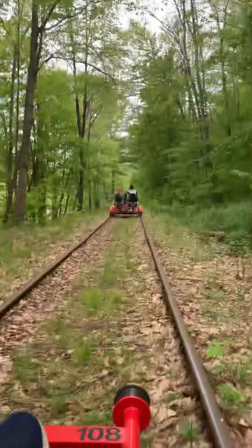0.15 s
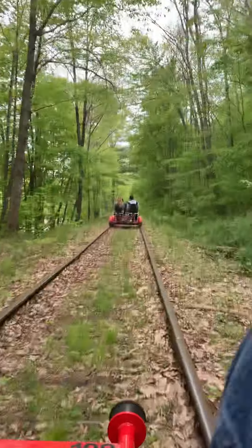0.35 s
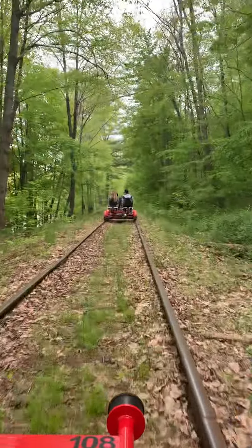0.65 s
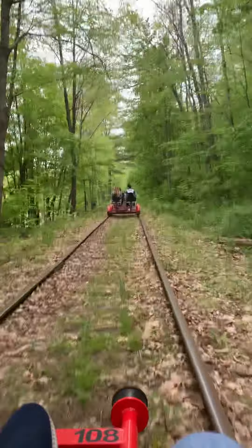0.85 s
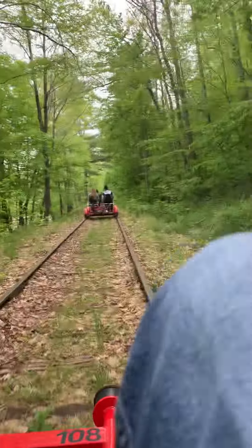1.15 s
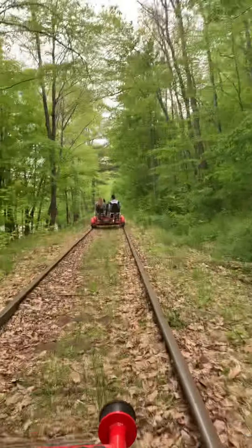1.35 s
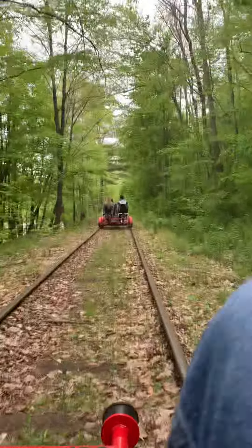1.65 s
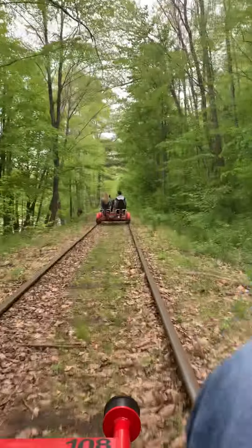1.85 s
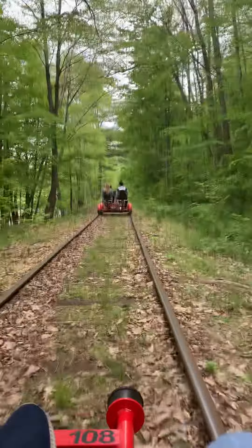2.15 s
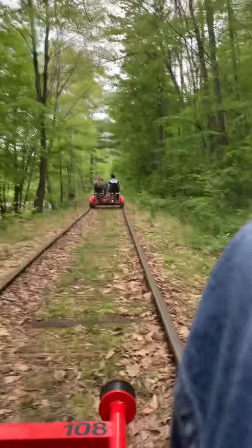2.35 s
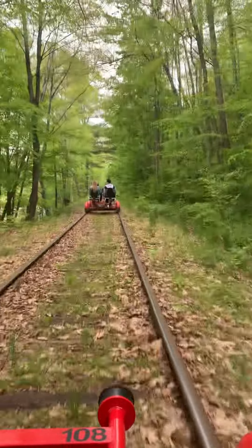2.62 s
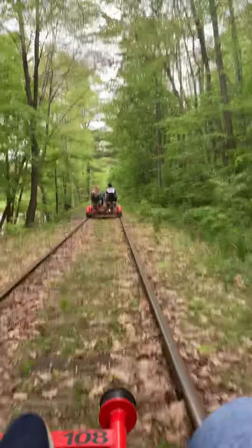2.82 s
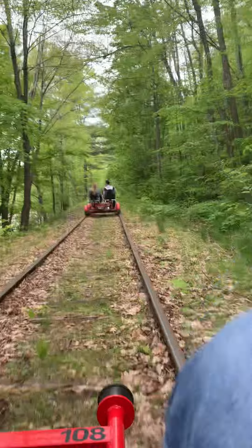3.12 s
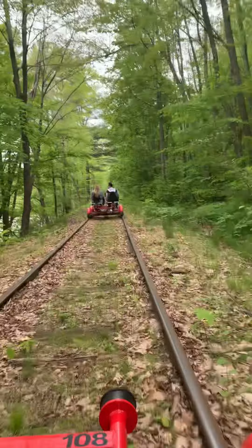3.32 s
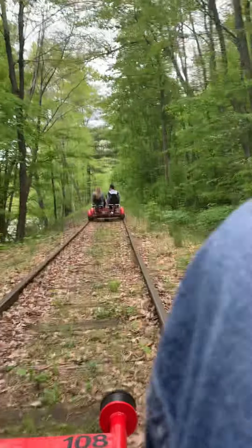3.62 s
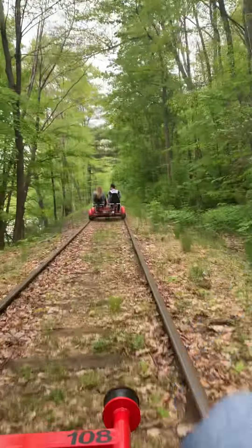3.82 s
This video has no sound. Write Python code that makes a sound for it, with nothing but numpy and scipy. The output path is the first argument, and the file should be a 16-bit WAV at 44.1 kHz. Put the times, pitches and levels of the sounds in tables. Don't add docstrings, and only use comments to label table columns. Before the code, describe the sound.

Hard wheels of a pedal-driven rail cart roll with low rumble, metallic rattling and sharp knocks.

```python
import sys
import numpy as np
from scipy import signal
from scipy.fft import rfft, irfft, dct, next_fast_len
from scipy.io import wavfile
from scipy.ndimage import uniform_filter1d

SR = 44100
rng = np.random.default_rng(int(sys.argv[2]) if len(sys.argv) > 2 else 0)


def invert_db(level):
    return 10 ** (np.asarray(level, dtype=float) / 20)


def transcribe(signal):
    frames = np.atleast_2d(signal).T
    limited = np.clip(frames, -1, 1)
    pcm = np.round(limited * 32767).astype(np.int16)
    wavfile.write(sys.argv[1], SR, pcm)


N = 175518

SIZE, HIT = next_fast_len(N), 4096
F_HZ = np.arange(SIZE // 2 + 1) * SR / SIZE
HIT_HZ = np.arange(HIT // 2 + 1) * SR / HIT
NOISE = rng.standard_normal((2, N))
WHITE = rfft(NOISE, SIZE)


def line(table, hz):
    table = np.array(table, float)
    return np.interp(np.log(hz + 1), np.log(table[:, 0]), table[:, 1])


def unit(x):
    return x / np.sqrt(np.mean(np.abs(x) ** 2, axis=-1, keepdims=True))


def walk(rate_hz):
    hold = int(SR / rate_hz)
    steps = np.repeat(rng.standard_normal(N // hold + 1), hold)
    return 1.68 * uniform_filter1d(uniform_filter1d(steps, hold), hold)[:N]


def shaped(gain):
    return irfft(np.roll(WHITE, rng.integers(SIZE // 2), axis=1) * gain, SIZE)[:, :N]


def ring(hz, width_hz, order):
    r = np.exp(-np.pi * width_hz / SR)
    x = np.roll(NOISE, rng.integers(N), axis=1)
    for _ in range(order):
        x = signal.lfilter([1], [1, -2 * r * np.cos(2 * np.pi * hz / SR), r * r], x)
    return unit(x)


def mode(f, hz, width_hz):
    return 1 / (1 + 2j * (f - hz) / width_hz)


def glide(x):
    rate = 0.07 * walk(9)
    at = np.arange(N) + np.cumsum(rate - rate.mean())
    return np.array([np.interp(at, np.arange(N), v) for v in x])


def burst(length_s, rise_s, tail_db, tail_s=0.055):
    t = np.arange(HIT) / SR
    blow = invert_db(-2) * np.exp(-t / 0.004)
    shudder = np.exp(-(t / length_s[:, None, None]) ** 2)
    tail = invert_db(tail_db) * np.exp(-t / tail_s)
    shape = (1 - np.exp(-t / rise_s)) * (blow + shudder + tail) * (1 - t / t[-1])
    return rfft(shape * rng.standard_normal((len(length_s), 2, HIT)))


def place(hits, table, trim_db):
    out = np.zeros((2, N + HIT))
    for (t, db, *_), hit in zip(table, hits):
        i = int(t * SR)
        out[:, i:i + HIT] += invert_db(db + trim_db) * hit / np.abs(hit).max()
    return out[:, :N]


# f/Hz, width/Hz, level/dB
BODY = [(114.3, 67, -6), (147.3, 26.6, 0.5), (176.6, 31, 0), (211, 47, 0.5), (249, 57, -0.5),
        (304.6, 38, -1.5), (345.2, 32.7, 1.5)]
# f/Hz, density/dB per Hz
GROUND = [(20, -44), (40, -30), (65, -9), (100, -21), (160, 13.5), (350, -4), (600, -32), (2500, -74)]


def rumble(load_db):
    modes = 0
    for hz, width_hz, db in BODY:
        modes = modes + invert_db(db + 1.58 * walk(18)) * glide(ring(hz, width_hz, order=2))
    deep = invert_db(1.8 * walk(9.35)) * unit(shaped(invert_db(line(GROUND, F_HZ))))
    return invert_db(load_db - 0.04) * (unit(modes) + invert_db(-7) * deep)


# f/Hz, width/Hz, level/dB
FRAME = [(594, 22, -2.5), (690, 113, 3), (759, 21, 2), (955, 36, 0), (1054, 240, -9), (1275, 31, 2),
         (1480, 115, -1), (1536, 20, -10), (2038, 27, -11), (2500, 97, -5), (2676, 180, -12),
         (3170, 19, -9), (3424, 54, -9.5), (3977, 24, -47)]
# f/Hz, density/dB per Hz
LOOSE_COLOUR = [(300, -2), (600, 1.3), (1400, -7.5), (2200, -13.5), (4500, -17.5), (8000, -23.5),
                (11000, -31.5), (16000, -37)]


def chatter(shake_db):
    mean_db = shake_db.mean()
    swing_db = shake_db - mean_db
    jolt, crackle_db = walk(24), 1.7 * walk(90)
    buzz = rings = 0
    for hz in 300 * 2 ** np.arange(0, 6.1, 0.5):
        band = np.exp(-(np.log2((F_HZ + 1) / hz) / 0.46) ** 2)
        follow = 1 if hz < 4000 else 0.38
        level_db = follow * (swing_db + 1.35 * jolt) + 1.85 * walk(35)
        level_db = level_db + (hz > 4000) * crackle_db
        buzz = buzz + invert_db(level_db) * shaped(invert_db(line(LOOSE_COLOUR, F_HZ)) * band)
    for hz, width_hz, db in FRAME:
        rings = rings + invert_db(db + 1.7 * jolt + 3.7 * walk(24.01)) * ring(hz, width_hz, order=1)
    return invert_db(mean_db + 2) * (unit(buzz) + invert_db(-3 + swing_db) * unit(rings))


def sure(blows, response):
    strength = np.sqrt(np.mean(np.abs(blows) ** 2) * np.mean(np.abs(response) ** 2))
    return unit(blows * response[:, None]) * strength


def strike(table, length_s, rise_s, trim_db, high_db=-5):
    f, rows, frame = HIT_HZ, np.array(table), np.array(FRAME)
    mix = invert_db(2.5 * rng.standard_normal((len(rows), len(frame))) + frame[:, 2])
    rings = mix @ np.array([(-1) ** k * mode(f, hz, w) for k, (hz, w, _) in enumerate(FRAME)])

    bright_db = rows[:, 2:3] + 21
    tilt_db = bright_db * np.clip(np.log2((f + 1) / 2000), 0, 1)
    dull_db = -5.5 * np.maximum(np.log2((f + 1) / 4500), 0)
    rough = invert_db(tilt_db + dull_db) * invert_db(line(LOOSE_COLOUR, f)) * np.clip(f / 300, 0, 1)
    body = rough + invert_db(-1) * rings + invert_db(-1.5) * mode(f, 261, 150)

    blows = burst(np.full(len(rows), length_s), rise_s, tail_db=-4)
    low = invert_db(6) * sure(blows, mode(f, rows[:, 3:4], 72))
    high = invert_db(high_db + 0.76 * bright_db[:, :, None]) * sure(blows, mode(f, rows[:, 4:5], 72))
    return place(irfft(blows * body[:, None] + low + high, HIT), table, trim_db)


# t/s, peak level/dB, brightness/dB, low ring f/Hz, high ring f/Hz
CLACKS = [(0.022, -7.5, -27.5, 616, 2270), (0.389, 0, -23, 806, 1990), (0.592, -2.5, -29, 602, 2110),
          (0.931, -0.5, -14, 1480, 3450), (1.496, -1.5, -23.5, 1242, 1900), (1.854, -5.5, -20.5, 605, 2440),
          (2.415, -3.5, -26, 1573, 2220), (2.726, -4, -33, 740, 2030), (3.0, -3.5, -23, 720, 2050),
          (3.067, -7, -22, 940, 2620), (3.804, -6, -23, 594, 2090)]


def clacks():
    return strike(CLACKS, length_s=0.026, rise_s=0.0009, trim_db=0.84)


# t/s, peak level/dB, ring f/Hz
BUMPS = [(0.028, -10.5, 290), (0.388, -9, 263), (0.518, -12.5, 142), (0.594, -9.5, 321), (0.663, -9, 180),
         (0.899, -12, 220), (1.135, -14, 215), (1.217, -11.5, 229), (1.275, -11, 150), (1.451, -10, 223),
         (1.492, -8, 312), (1.538, -14, 175), (1.845, -11, 175), (2.172, -7.5, 226), (2.215, -9.5, 150),
         (2.417, -11, 164), (2.677, -11, 202), (3.003, -11, 270), (3.064, -8.5, 323), (3.153, -9.5, 195),
         (3.252, -9, 282), (3.809, -12.5, 300)]


def bumps():
    rows = np.array(BUMPS)
    blows = burst(np.full(len(rows), 0.018), rise_s=0.004, tail_db=-13.5)[:, :1]
    swing = mode(HIT_HZ, rows[:, 2:3], 66)[:, None] ** 2
    return place(irfft(blows * swing, HIT), BUMPS, trim_db=-7)


# t/s, peak level/dB, brightness/dB, low ring f/Hz, high ring f/Hz
RATTLES = [(0.43, -12.5, -11.5, 750, 2500), (0.571, -18, -26, 762, 2400), (0.772, -13, -22, 730, 1760),
           (1.089, -18.5, -16.5, 660, 1700), (1.166, -7, -20.5, 1270, 1980), (1.477, -3.5, -20, 1240, 3230),
           (1.665, -17, -26, 530, 2410), (2.036, -16.5, -19, 1250, 2380), (2.07, -16.5, -20, 834, 2610),
           (2.477, -14, -20, 528, 1910), (2.68, -19, -19, 915, 1810), (2.881, -11.5, -24, 762, 1720),
           (2.94, -18, -23, 759, 2180), (3.138, -14, -26, 759, 2740), (3.47, -18.5, -19, 528, 2510),
           (3.555, -21.5, -19, 719, 1690), (3.635, -15.5, -24, 754, 1730), (3.874, -16, -22, 589, 3470),
           (3.82, -12, -19, 1250, 3570), (0.366, -11.5, -17, 660, 2500), (0.461, -11.5, -17.5, 780, 2500),
           (0.691, -8.5, -46, 1274, 2070), (0.837, -11, -27, 668, 1880), (0.882, -12, -10, 1550, 2220),
           (0.972, -9.5, -13.5, 1270, 3650), (1.569, -7.5, -15, 1350, 2220),
           (1.627, -11.5, -23, 1290, 2380), (1.799, -11, -25, 1275, 3020), (2.101, -9.5, -25, 647, 2020),
           (2.543, -12.5, -20.5, 730, 1740), (2.758, -8.5, -19.5, 1280, 1990),
           (2.976, -8.5, -34, 780, 2150), (3.2, -8.5, -34, 777, 2450), (3.287, -11.5, -18, 1230, 1910),
           (3.377, -11.5, -18, 870, 2570), (3.51, -12.5, -16.5, 527, 2180), (3.665, -14, -25, 636, 3170),
           (3.71, -10.5, -22, 634, 2710), (3.959, -10.5, -36, 985, 1900)]


def rattles():
    return strike(RATTLES, length_s=0.023, rise_s=0.0036, trim_db=-2.2, high_db=-8.5)


# t/s, peak level/dB, length/s
TICKS = [(0.874, -33, 0.0067), (1.0924, -33.5, .005), (1.3673, -34, .005), (1.412, -35, .004),
         (1.5075, -28, 0.016), (1.721, -33, 0.0042), (1.9954, -38, .005), (2.103, -38, .004),
         (3.2016, -35, .006), (3.3857, -28, .008), (3.6117, -36, .005), (0.89, -30, 0.0067),
         (1.24, -33, 0.0051), (1.453, -31, 0.0046), (1.735, -19.5, 0.0068), (2.2917, -19, 0.013),
         (2.39, -30, 0.0063), (3.057, -22.5, 0.006), (3.2545, -17.5, 0.0053)]
# f/Hz, level/dB
TICK_COLOUR = [(1500, -26), (3500, -0.5), (6000, 2), (9000, 0.5), (12000, -9), (16000, -14)]


def ticks():
    blows = burst(np.array(TICKS)[:, 2], rise_s=0.00035, tail_db=-17, tail_s=0.033)
    return place(irfft(blows * invert_db(line(TICK_COLOUR, HIT_HZ)), HIT), TICKS, trim_db=3.2)


# t/s, peak level/dB, brightness/dB, low ring f/Hz, high ring f/Hz
KNOCKS = [
    (1.274, -4.5, -19, 790, 2124),
    (2.172, -4.5, -19, 1410, 2030),
    (2.736, -6.5, -26, 705, 3400),
    (2.893, -6.5, -33, 1270, 2050),
    (3.255, -0.5, -17.5, 1266, 2000),
    (1.454, -14, -21, 735, 1960),
    (3.017, -8, -28, 1480, 2680),
    (0.938, -8.5, -12, 3470, 2700),
]


def knocks():
    return strike(KNOCKS, length_s=0.012, rise_s=0.0009, trim_db=0.7)


# t/s, wheel load as rumble level/dB, shaking as chatter level/dB
RIDE = [(0.0, -26.5, -29), (0.42, -19.5, -25), (0.44, -24.5, -28), (0.66, -20, -28.5), (0.79, -28, -27),
        (0.94, -22, -25), (1.07, -29.5, -35), (1.16, -21, -25.5), (1.42, -23, -28), (1.61, -19.5, -27.5),
        (1.73, -28, -30.5), (1.78, -20.5, -28.5), (2.16, -25, -28), (2.17, -19, -28.5), (2.53, -24, -31),
        (3.21, -20.5, -27), (3.47, -20.5, -29.5), (3.98, -24, -28)]
# f/Hz, share/0-1
ALIKE = [(40, 0.8), (175, 1.5), (300, 0.85), (550, 0.26), (1400, 0.68), (2500, 0.5), (3600, 0.08),
         (4500, 0.96)]
# f/Hz, level/dB
LEAN = [(40, -1.5), (130, -2.5), (300, -5), (600, -2.5), (2000, -1), (4000, 0.5)]


def scene():
    t, ride = np.arange(N) / SR, np.array(RIDE)
    load_db = np.interp(t, ride[:, 0], ride[:, 1])
    shake_db = np.interp(t, ride[:, 0], ride[:, 2])
    rolling = rumble(load_db) + chatter(shake_db)
    hits = clacks() + bumps() + rattles()
    snaps = ticks()
    hits = hits + snaps + knocks()

    one, other = rfft(rolling + hits, SIZE)
    alike = np.clip(line(ALIKE, F_HZ), 0, 1)
    lean = invert_db(line(LEAN, F_HZ) / 2)
    lag_s, knee_hz, extra_lag_s = 8.6e-5, 4070, 1.52e-4
    late = np.exp(-2j * np.pi * (F_HZ * lag_s + np.maximum(F_HZ - knee_hz, 0) * extra_lag_s))
    right = (alike * one + np.sqrt(1 - alike ** 2) * other) * late
    ports = irfft(np.array([one * lean, right / lean]), SIZE)[:, :N]
    return ports + invert_db(-17.5) * snaps


BAND_EDGES = [176, 196, 216, 240, 264, 292, *range(320, 480, 32), *range(480, 752, 16)]


def thin_treble(x):
    hop, start = 1024, 560
    step_db, weak_db, weak_scatter_db, quiet_db, snap_db = -0.5, -5.6, 1.5, -48.5, 7
    pad, half = 2 * hop - start, hop // 2
    both = np.array([x[0] + x[1], x[0] - x[1]])
    both = np.pad(both, ((0, 0), (pad, 2 * hop - (pad + N) % hop))).reshape(2, -1, hop)
    sine = np.sin(np.pi * (np.arange(2 * hop) + 0.5) / (2 * hop))
    frames = np.concatenate([both[:, :-1], both[:, 1:]], axis=2) * sine
    a, b, c, d = np.split(frames, 4, axis=2)
    folded = np.concatenate([-c[..., ::-1] - d, a - b[..., ::-1]], axis=2)
    lines = dct(folded, type=4, norm="ortho")

    treble = np.sqrt(np.sum(lines[..., BAND_EDGES[8]:] ** 2, axis=(0, 2))) + 1e-9
    snap = treble > invert_db(snap_db) * np.roll(treble, 1)
    for lo, hi in zip(BAND_EDGES, BAND_EDGES[1:]):
        size = np.sqrt(np.mean(lines[..., lo:hi] ** 2, axis=2)) + 1e-12
        luck = invert_db(weak_scatter_db * rng.standard_normal(size.shape))
        strong = size > luck * invert_db(weak_db) * size[::-1]
        keep = (strong | snap) & (size > luck * invert_db(quiet_db))
        step = invert_db(step_db) * size[..., None]
        lines[..., lo:hi] = keep[..., None] * step * np.round(lines[..., lo:hi] / step)

    u = dct(lines, type=4, norm="ortho")
    u = np.concatenate([u[..., half:], -u[..., ::-1], -u[..., :half]], axis=2) * sine
    joined = (u[:, :-1, hop:] + u[:, 1:, :hop]).reshape(2, -1)
    mid, side = joined[:, pad - hop:pad - hop + N] / 2
    return np.array([mid + side, mid - side])


def top_cut(x):
    return signal.sosfilt(signal.butter(12, 16000, fs=SR, output="sos"), x)


def record(dry):
    x = np.tanh(0.9 * dry) / 0.92
    x = signal.sosfilt(signal.butter(3, 53, "high", fs=SR, output="sos"), x)
    x = signal.sosfilt(signal.ellip(10, 0.2, 70, 15680, fs=SR, output="sos"), x)
    return top_cut(thin_treble(x))


dry = scene()
out = record(dry)
transcribe(out)
```